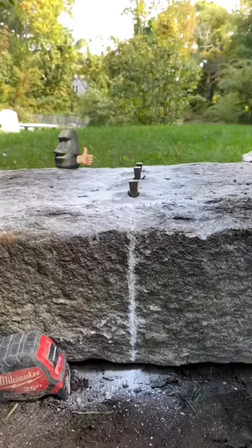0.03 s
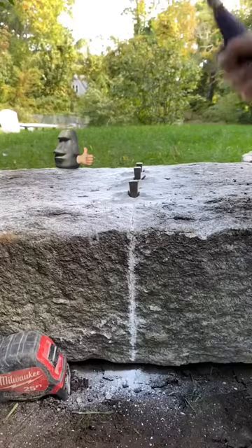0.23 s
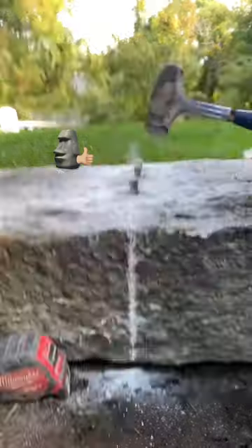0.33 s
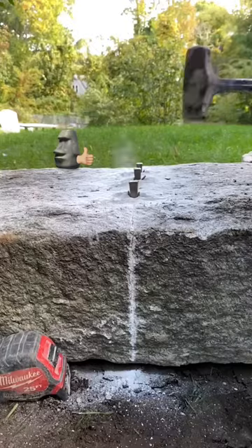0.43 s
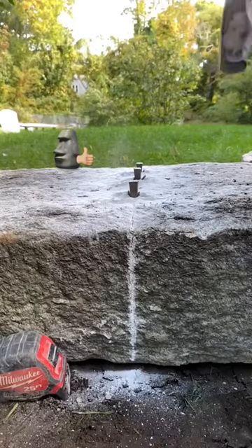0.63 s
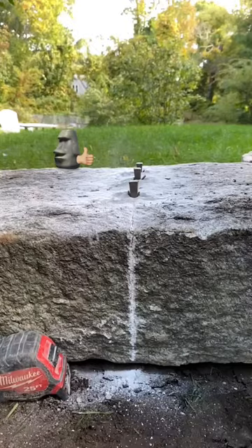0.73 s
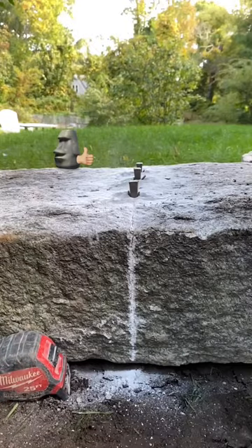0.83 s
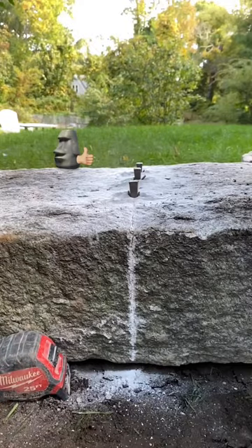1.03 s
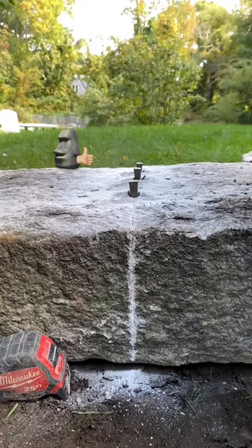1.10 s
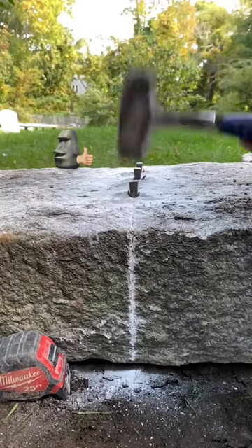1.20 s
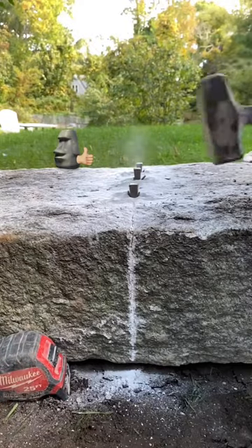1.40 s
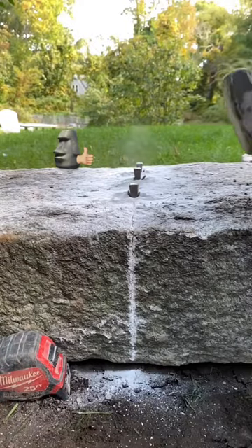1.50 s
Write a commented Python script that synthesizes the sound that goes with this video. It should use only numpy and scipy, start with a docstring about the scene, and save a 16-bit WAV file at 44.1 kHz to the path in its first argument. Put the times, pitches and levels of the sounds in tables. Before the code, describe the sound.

Two sharp sledgehammer blows on metal wedges in stone, each with a heavy thump, outdoors.

```python
"""Sledgehammer on stone wedges

A sledgehammer twice strikes steel wedges set in a stone slab on a quiet lawn. Each blow is a hard
steel crack and a thump whose lows arrive late; the slab rings briefly, then knocks as it settles.
Grit scatters, a distant bird calls after the first blow, and the garden echoes faintly over
rustles, a low rumble and insects."""
import sys
import numpy as np
from scipy import signal
from scipy.fft import rfft, irfft
from scipy.io import wavfile

SR = 44100
rng = np.random.default_rng(int(sys.argv[2]) if len(sys.argv) > 2 else 0)


def store_wav(level_fs):
    """Save 16-bit WAV to argv[1]."""
    pcm = np.round(np.clip(np.atleast_2d(level_fs), -1, 1) * 32767)
    wavfile.write(sys.argv[1], SR, pcm.T.astype(np.int16))


N = 68355
T = np.arange(N) / SR

# slab modes: f/Hz, level/dB, t60/s
SLAB_MODES = [(366.4, 9, 0.08), (383, -12.5, 0.024), (333.7, -17, 0.31), (700, -22.5, 0.043),
              (55, -20, .25)]
# stereo width of steel, echoes and lawn: f/Hz, side minus mid/dB
STEEL_WIDTH = [(600, -7), (1700, -11.5), (2800, 0.5), (3600, -11), (4800, 3), (6000, -8.5), (9000, -2.5)]
ECHO_WIDTH = [(100, -9.5), (360, -19.5), (600, 0), (1070, 6), (1900, 1.5), (6000, -1), (10000, 0.5)]
LAWN_WIDTH = [(110, -24.5), (190, -18), (340, -13.5), (600, -1), (1070, 3.5), (1900, -3.5), (3400, 2),
              (6000, -7), (10000, 0)]


def from_db(db):
    """Decibels to gain."""
    return 10 ** (np.asarray(db) / 20)


def rms_one(x):
    """Scale to unit rms."""
    return x / np.sqrt(np.mean(x ** 2) + 1e-20)


def gains(spectrum, hz):
    """Gain of an (f/Hz, level/dB) table, interpolated over log frequency."""
    f, db = np.transpose(spectrum)
    return from_db(np.interp(np.log(hz + 1), np.log(f), db))


def equalise(x, spectrum):
    """Zero-phase filter from an (f/Hz, level/dB) table."""
    hz = np.fft.rfftfreq(2 * N, 1 / SR)
    return irfft(rfft(x, 2 * N) * gains(spectrum, hz))[..., :N]


def noise(spectrum, width):
    """Coloured stereo noise, width set per frequency; unit rms."""
    mid, side = rng.standard_normal((2, N))
    stereo = mid + equalise(side, width) * [[1], [-1]]
    return rms_one(equalise(stereo, spectrum))


def drift(cutoff_hz):
    """Low-passed random wander; unit rms."""
    lowpass = signal.butter(2, cutoff_hz, fs=SR, output="sos")
    return rms_one(signal.sosfilt(lowpass, rng.standard_normal(N)))


def burst(at_s, rise_s, t60_s):
    """Exponential rise to 1 at at_s, then exponential decay."""
    return np.exp(np.minimum(T - at_s, 0) / rise_s) * from_db(-60 * np.maximum(T - at_s, 0) / t60_s)


def swell(at_s, width_s):
    """Gaussian envelope."""
    return np.exp(-((T - at_s) / width_s) ** 2)


def lag_left(x, lag_s):
    """Mono to stereo, left lag_s behind right."""
    return np.array([np.interp(T - lag_s / 2, T, x), np.interp(T + lag_s / 2, T, x)])


def blows():
    """Hammer hits wedge: steel crack, dust spray, thump, slab ring, garden echo and grit."""
    # t/s, crack/dB, rise/s, crack t60/s, thump/dB, thump lag/cycles, ring/dB, echo/dB, grit/dB, dust/dB
    strikes = [(0.2465, -9.5, .0004, 0.0094, 36.5, 2.3, -31, -27, -57, -32.5),
               (1.1604, -12, 0.0019, 0.015, 25.5, 1.338, -24, -46.5, -60.5, -38.5)]
    # crack and thump spectra, one per blow: f/Hz, level/dB
    crack_spectra = [
        [(500, -13), (1100, 3), (2400, 6), (2750, -2), (3150, 2.5), (3600, -9), (4300, 3.5), (4800, -21.5),
         (5300, 0.5), (6400, -0.5), (8100, -3.5), (9000, 1), (9900, -22.5)],
        [(500, -13), (1100, -4), (1700, -4.5), (2300, 5.5), (2750, -9), (3100, 2.5), (4200, -2), (4800, -17),
         (6000, -9), (8000, -5), (9400, 5.5), (10100, 3)],
    ]
    thump_spectra = [
        [(25, -30.5), (55, -13), (90, -5), (135, -18.5), (195, -7), (260, -0.5), (340, 4), (490, -22),
         (680, -6), (880, -26), (1100, -14), (1550, -29), (1760, -16.5), (3000, -43)],
        [(25, -15), (55, -3), (90, 2), (140, -4), (200, 1.5), (290, 1.5), (420, 3.5), (560, -18.5), (720, -8.5),
         (1000, -36), (1400, -44), (3000, -28.5)],
    ]
    # garden echo spectrum: f/Hz, level/dB
    echo_spectrum = [(40, -3.5), (200, 2.5), (370, 21), (480, 3.5), (680, -1.5), (900, -15), (2000, -22),
                     (3500, -20.5), (4800, -25.5), (6500, -24), (9500, -20), (11000, -45)]
    pan = from_db([[-1.5], [1.5]])
    out = np.zeros((2, N))
    for strike, crack_spectrum, thump_spectrum in zip(strikes, crack_spectra, thump_spectra):
        at_s, crack_db, rise_s, t60_s, thump_db, lag_cycles, ring_db, echo_db, grit_db, dust_db = strike
        crack_env = from_db(crack_db) * burst(at_s, rise_s, t60_s)
        dust_env = from_db(dust_db) * burst(at_s, rise_s, t60_s=0.085)  # stone dust and near echoes
        out += pan * (crack_env + dust_env) * noise(crack_spectrum, STEEL_WIDTH)
        body = from_db(thump_db) * thump(at_s, thump_spectrum, lag_cycles)
        body += from_db(ring_db) * slab_ring(at_s)
        out += lag_left(body, lag_s=0.00016)
        echo_onset = 1 - np.exp(-np.maximum(T - at_s, 0) / 0.008)
        echo_env = from_db(echo_db) * echo_onset * burst(at_s, rise_s, t60_s=0.42)
        out += echo_env * noise(echo_spectrum, ECHO_WIDTH)
        out += from_db(grit_db) * burst(at_s, rise_s, t60_s=0.45) * grit()
    return out


def thump(at_s, spectrum, lag_cycles):
    """Dispersed pulse: each frequency arrives lag_cycles of its own periods late, so pitch drops fast."""
    hz = np.fft.rfftfreq(2 * N, 1 / SR)
    main_mode_hz = SLAB_MODES[0][0]
    phase = 2 * np.pi * (hz * at_s + lag_cycles * np.log((hz + 1) / main_mode_hz))
    gate = np.clip((T - at_s) / 0.003 + 1, 0, 1)
    return gate * irfft(gains(spectrum, hz) * np.exp(-1j * phase))[:N]


def slab_ring(at_s, delay_s=0.004):
    """Damped slab modes, starting just after an impact."""
    age_s = np.maximum(T - at_s - delay_s, 0)
    return sum(from_db(db - 60 * age_s / t60_s) * np.sin(2 * np.pi * hz * age_s)
               for hz, db, t60_s in SLAB_MODES)


def grazes():
    """The hammer scrapes the wedge just before the second blow lands."""
    # contacts: t/s, level/dB, rise/s, t60/s
    contacts = [(1.1465, -39, 0.00096, 0.088), (1.1565, -29, 0.00094, 0.035)]
    # steel scrape spectrum: f/Hz, level/dB
    spectrum = [(300, 17), (1000, 2.5), (2200, -5), (3200, 8.5), (4300, -10), (5200, -4), (8000, -16.5),
                (9400, -8), (10500, -22)]
    envelope = sum(from_db(db) * burst(at_s, rise_s, t60_s) for at_s, db, rise_s, t60_s in contacts)
    return envelope * noise(spectrum, STEEL_WIDTH)


def settling():
    """The slab rocks back onto its bed: dull knock, thud and ring."""
    # landings: t/s, knock/dB, thud/dB, ring/dB
    landings = [(0.266, -63, 24.5, -32.5), (0.301, -31, 20.5, -38), (0.328, -68, 13, -41),
                (1.214, -49, 4.5, -56.5)]
    # knock and thud spectra: f/Hz, level/dB
    knock_spectrum = [(150, -6.5), (380, 5), (600, 5), (900, -12.5), (1250, -10), (2700, -22), (4000, -28),
                      (10000, -40)]
    thud_spectrum = [(25, -22), (55, 3), (95, 2.5), (140, -9), (205, 2), (300, -17.5), (500, -29.5),
                     (2000, -81.5)]
    out = np.zeros((2, N))
    for at_s, knock_db, thud_db, ring_db in landings:
        knock_env = from_db(knock_db) * burst(at_s, rise_s=0.001, t60_s=0.022)
        out += knock_env * noise(knock_spectrum, ECHO_WIDTH)
        thud = thump(at_s, thud_spectrum, lag_cycles=1.165)
        out += from_db(thud_db) * lag_left(thud, lag_s=0.00053)
        out += from_db(ring_db) * slab_ring(at_s)
    return out


def grit(grains_per_s=7500, spread_db=3.5):
    """Stone grains of uneven size tick on the slab; unit rms."""
    # tick spectrum: f/Hz, level/dB
    spectrum = [(800, -24.5), (2500, 0), (3800, 5.5), (4800, -0.5), (6500, -7.5), (9300, -1.5), (10500, -8)]
    sizes = from_db(spread_db * np.minimum(rng.exponential(1, (2, N)), 4))
    signs = rng.choice([-1, 1], (2, N))
    hits = rng.random((2, N)) < grains_per_s / SR
    return rms_one(equalise(sizes * signs * hits, spectrum))


def bird(flutter_depth=0.35):
    """Distant falling call on two harmonics; turns hoarse as its pitch jitter grows."""
    # call contour: t/s, fundamental/Hz, 3rd harmonic/dB, 4th harmonic/dB
    contour = [(0.35, 996, -81, -78), (0.381, 995, -72.5, -68.5), (0.43, 992, -70, -77),
               (0.445, 971, -86, -75), (0.46, 981, -82, -71.5), (0.48, 986, -71.5, -74.5),
               (0.508, 973, -76, -74), (0.555, 931, -65.5, -70), (0.61, 931, -68, -78),
               (0.69, 934, -76.5, -79), (0.741, 922, -90.5, -92)]
    times_s, fundamental_hz, *levels_db = np.transpose(contour)
    jitter_hz = np.interp(T, (0.44, 0.54), (2, 9)) * drift(cutoff_hz=110)
    pitch_hz = np.interp(T, times_s, fundamental_hz) + jitter_hz
    phase = 2 * np.pi * np.cumsum(pitch_hz) / SR
    out = np.zeros(N)
    for harmonic, db in zip((3, 4), levels_db):
        envelope = np.interp(T, times_s, from_db(db), left=0, right=0)
        flutter = 1 + flutter_depth * drift(cutoff_hz=50)
        out += envelope * flutter * np.sqrt(2) * np.sin(harmonic * phase)
    return out


def rustles():
    """Faint rustles come and go."""
    # swells: t/s, level/dB, width/s
    swells = [(0.141, -75, 0.069), (0.659, -69.5, 0.062), (1.23, -78.5, .04), (1.43, -71.5, 0.084)]
    # rustle spectrum: f/Hz, level/dB
    spectrum = [(1000, -15), (2400, -5), (2900, 6), (3900, 10), (5000, -9.5), (9500, -11), (11000, -30)]
    envelope = sum(from_db(db) * swell(at_s, width_s) for at_s, db, width_s in swells)
    return envelope * noise(spectrum, LAWN_WIDTH)


def lawn(rumble_db=-51, air_db=-69.5, insects_db=-74.5):
    """Distant rumble, leafy air and a thin band of insects; all dip briefly after the second blow."""
    # background spectra: f/Hz, level/dB
    air_spectrum = [(300, 6), (1000, -1.5), (2000, -1.5), (2400, -3), (3000, -1.5), (4000, -4), (4900, -8),
                    (5600, -5.5), (7300, -9.5), (8200, -20.5), (10000, -28), (12000, -37)]
    insect_spectrum = [(4500, -41.5), (5500, -16), (6000, -2.5), (6450, 2.5), (7000, -7.5), (7800, -25),
                       (9000, -52.5)]
    rumble_spectrum = [(15, -21), (30, -13.5), (52, 2.5), (110, -1), (170, -6), (250, -15.5), (390, -18.5),
                       (550, -30), (900, -35.5), (2000, -67.5)]
    air = from_db(air_db) * noise(air_spectrum, LAWN_WIDTH)
    insects = from_db(insects_db) * noise(insect_spectrum, LAWN_WIDTH)
    rumble = from_db(rumble_db) * noise(rumble_spectrum, LAWN_WIDTH)
    dip = swell(at_s=1.267, width_s=0.068)
    return from_db(-9 * dip) * rumble + from_db(-26 * dip) * (air + insects)


def scene():
    """Stereo sum of all sources."""
    return blows() + grazes() + settling() + bird() + rustles() + lawn()


def record(dry, start_s=0.0381, fade_s=0.0013, stopband_hz=10700):
    """Fast fade-in, steep low-pass."""
    fade_in = np.clip((T - start_s) / fade_s, 0, 1)
    lowpass = signal.cheby2(16, 60, stopband_hz, fs=SR, output="sos")
    return signal.sosfilt(lowpass, dry * fade_in)


dry = scene()
out = record(dry)
store_wav(out)
```